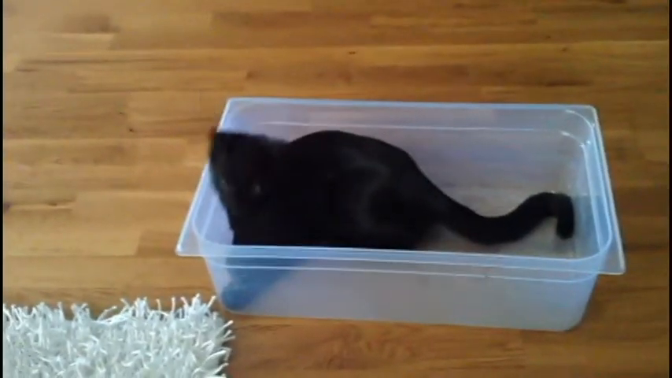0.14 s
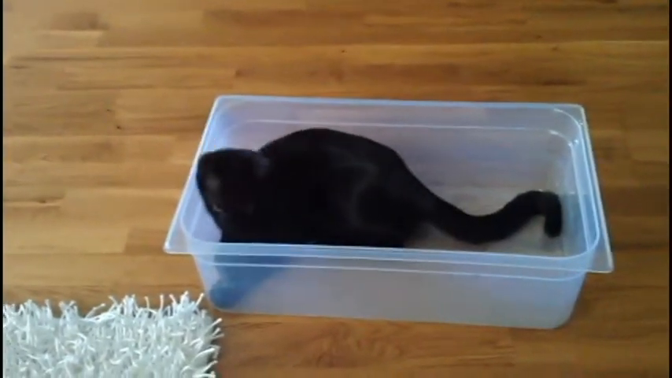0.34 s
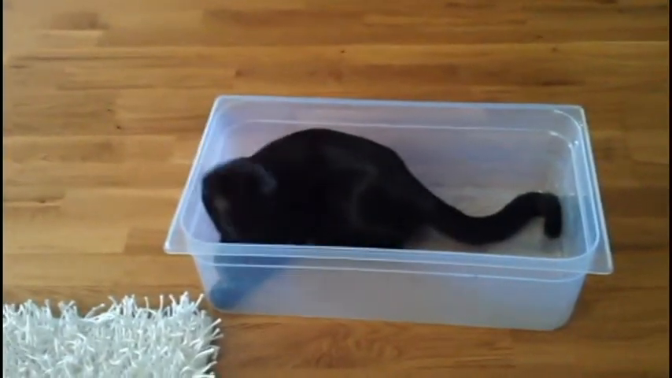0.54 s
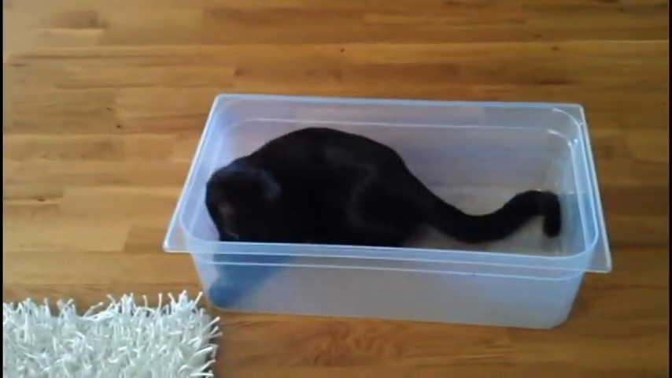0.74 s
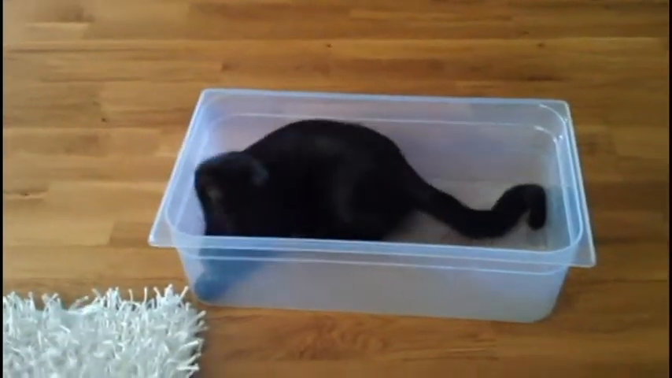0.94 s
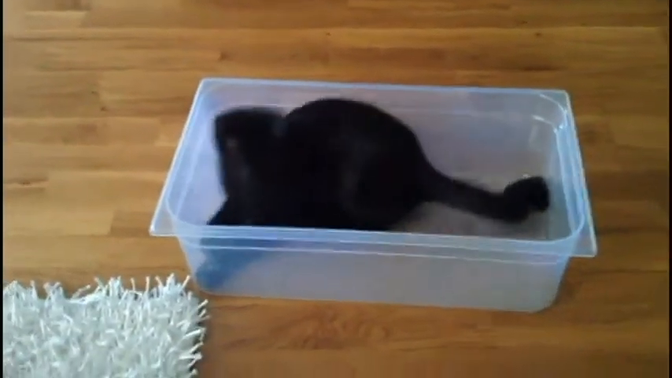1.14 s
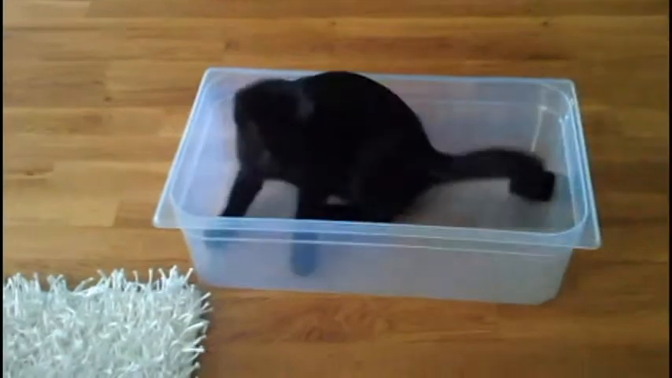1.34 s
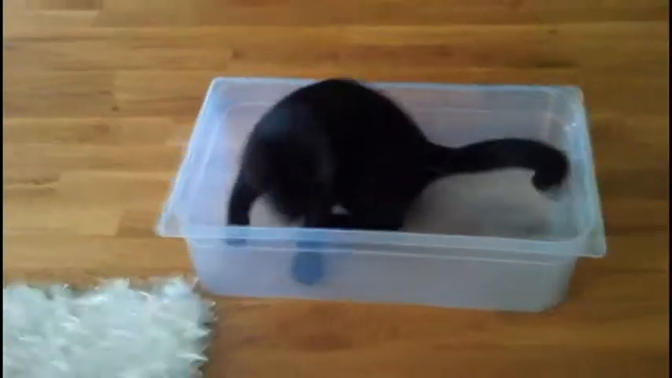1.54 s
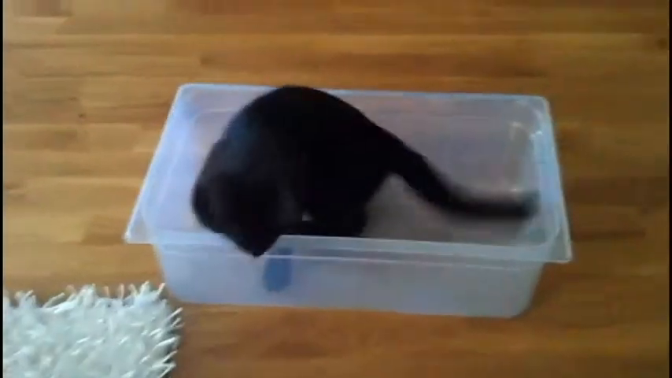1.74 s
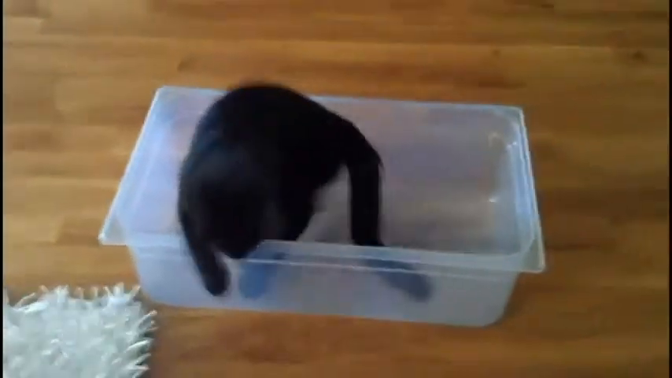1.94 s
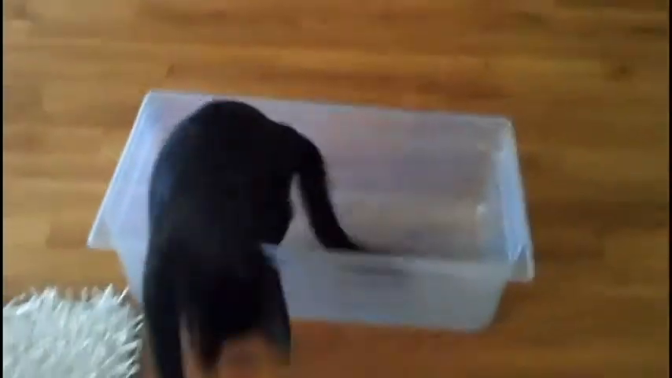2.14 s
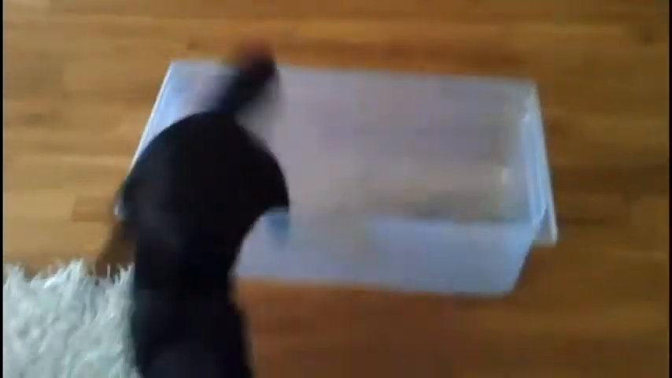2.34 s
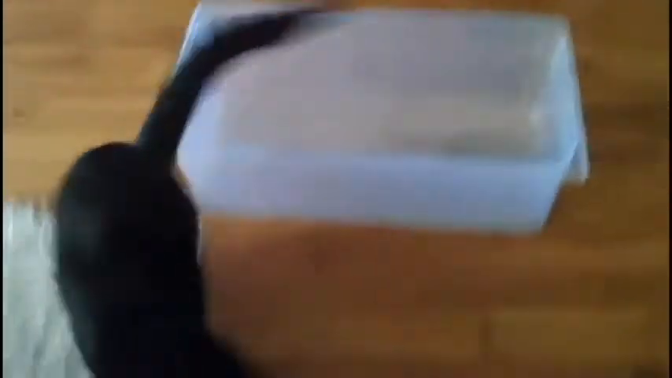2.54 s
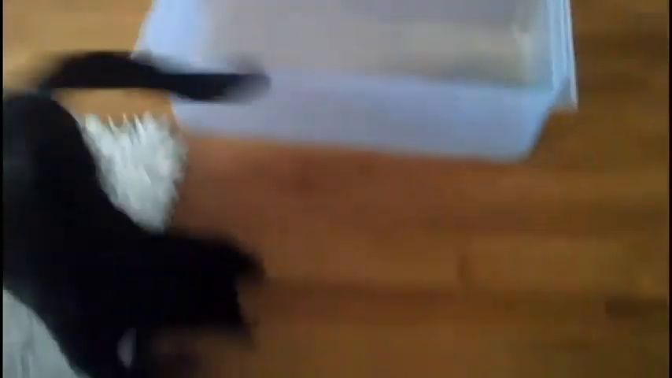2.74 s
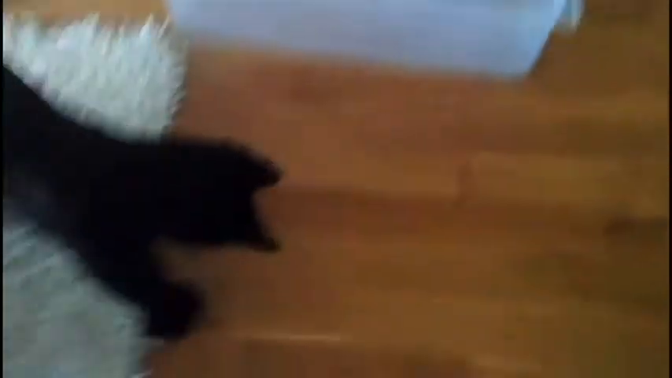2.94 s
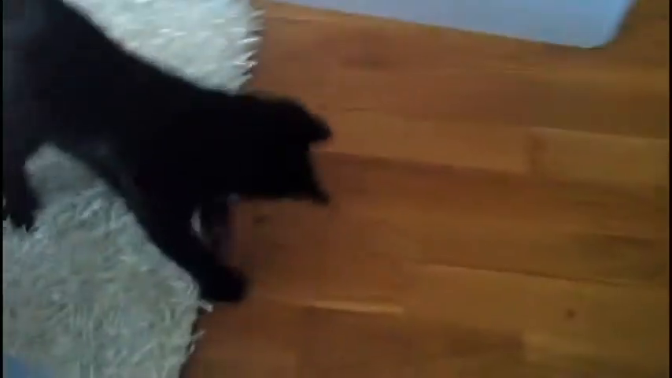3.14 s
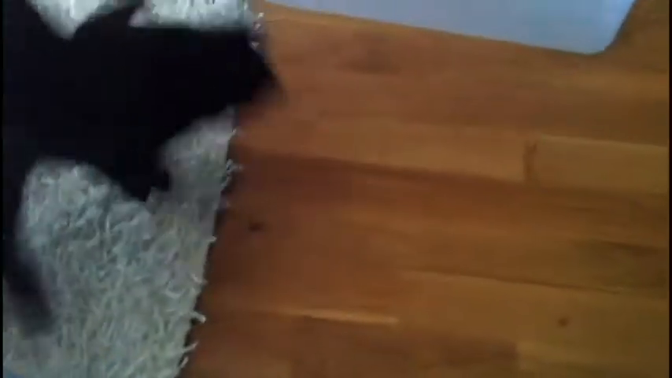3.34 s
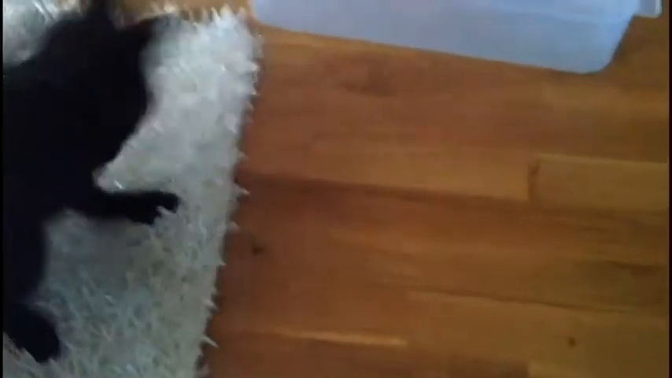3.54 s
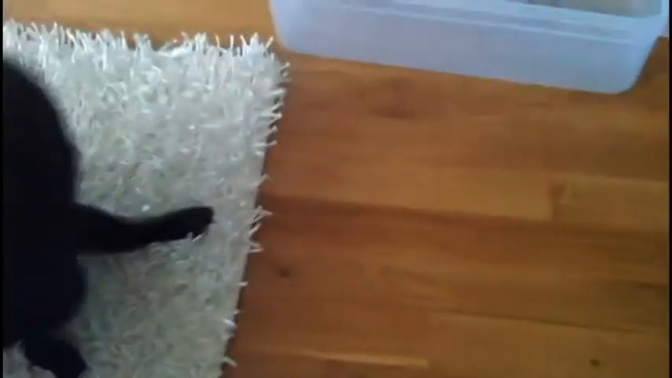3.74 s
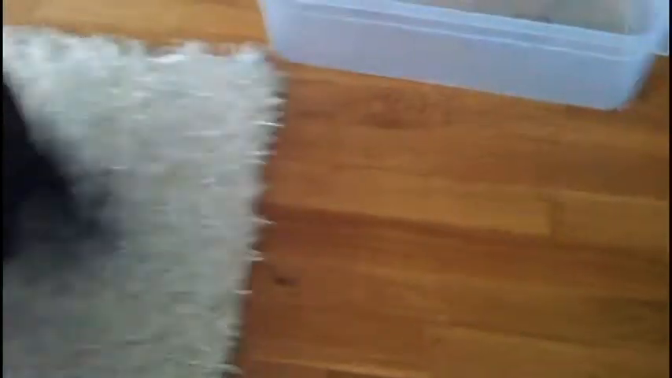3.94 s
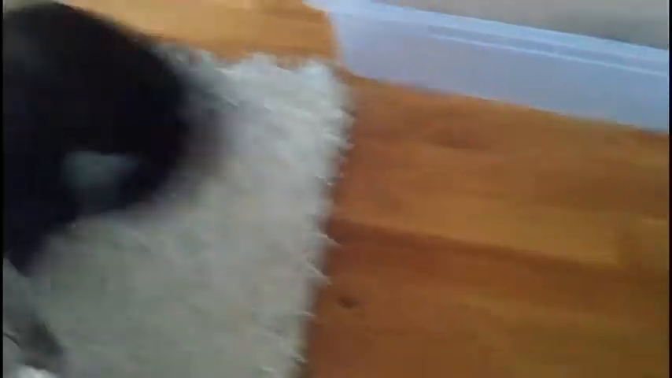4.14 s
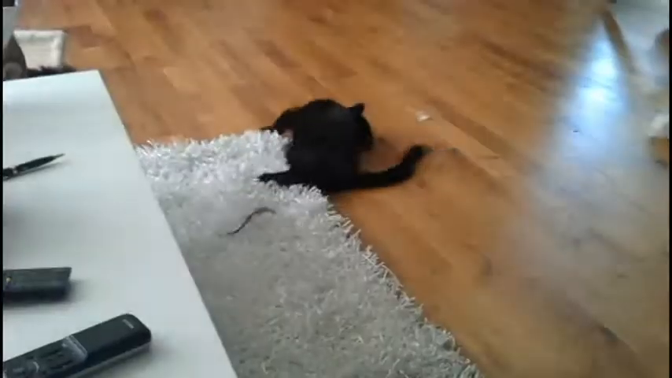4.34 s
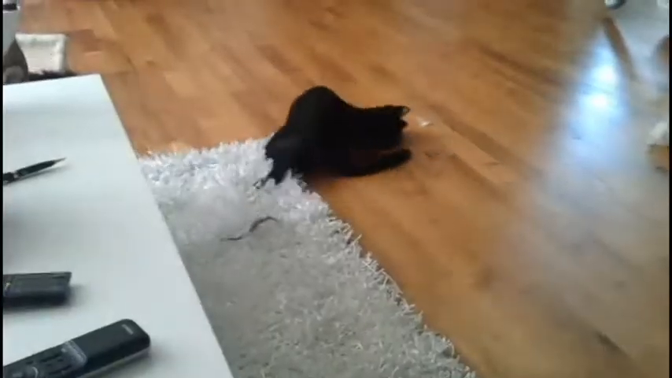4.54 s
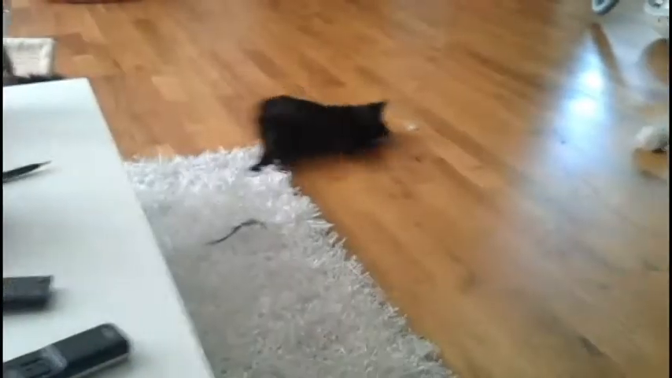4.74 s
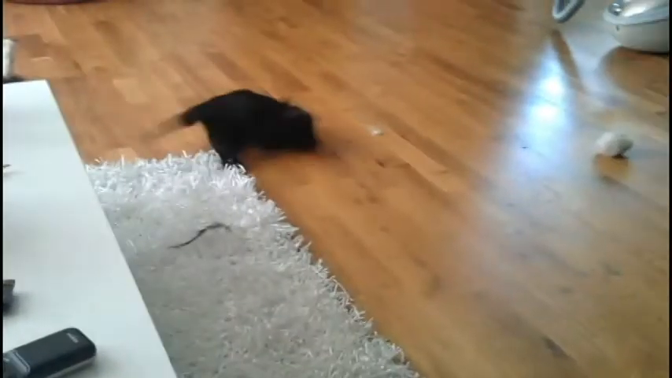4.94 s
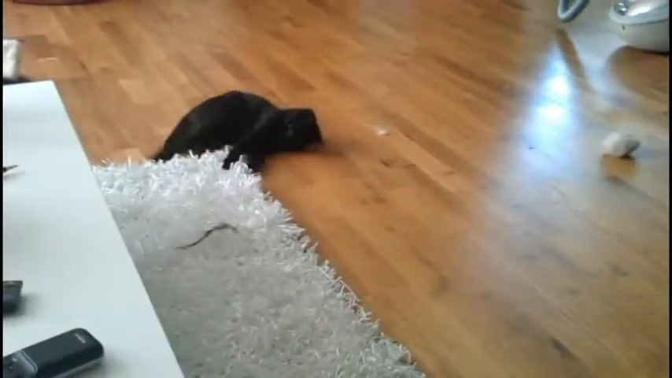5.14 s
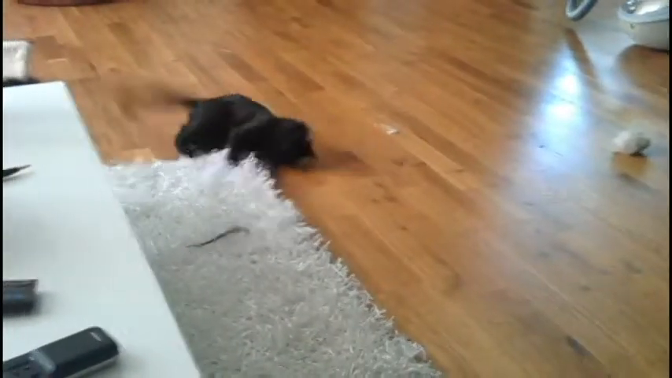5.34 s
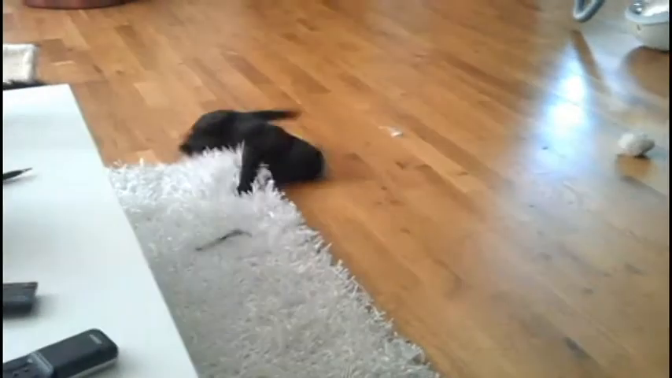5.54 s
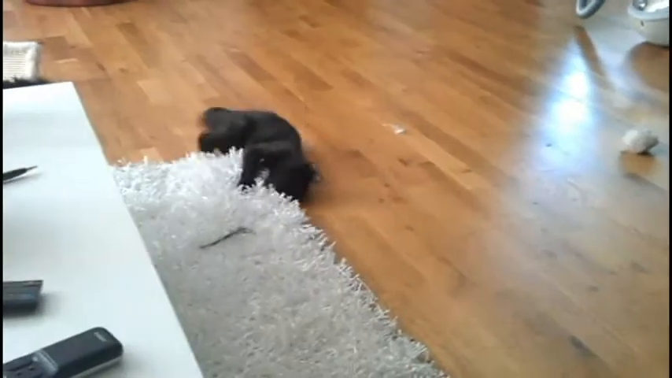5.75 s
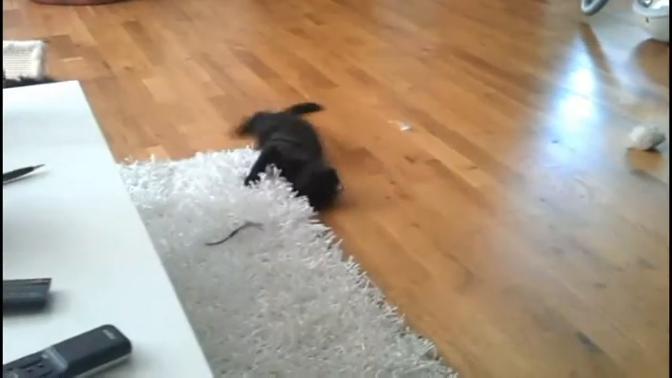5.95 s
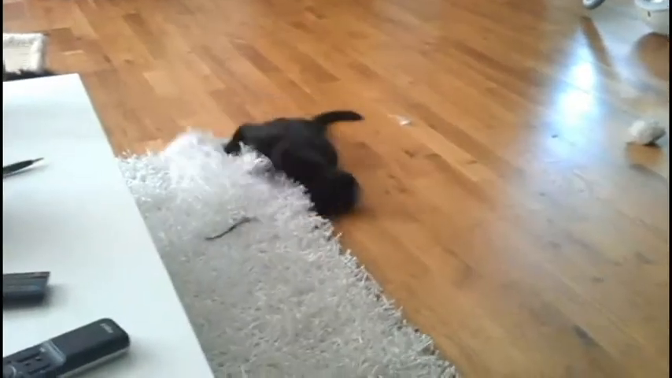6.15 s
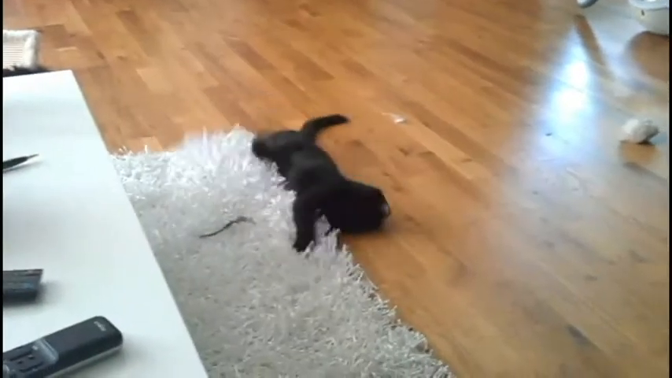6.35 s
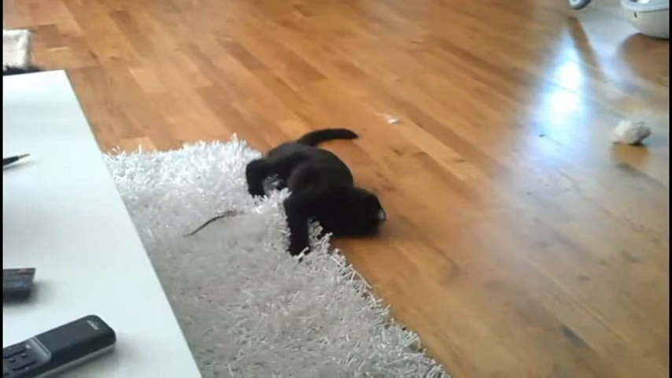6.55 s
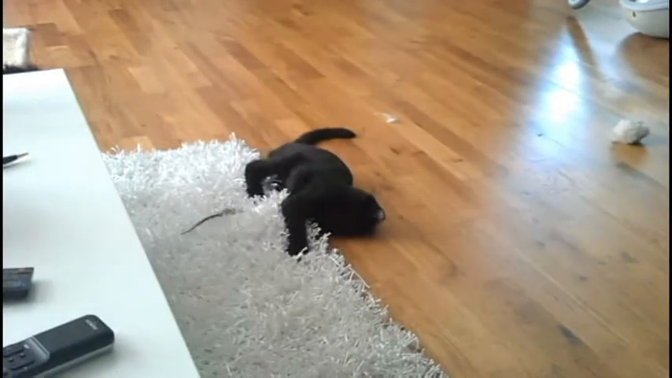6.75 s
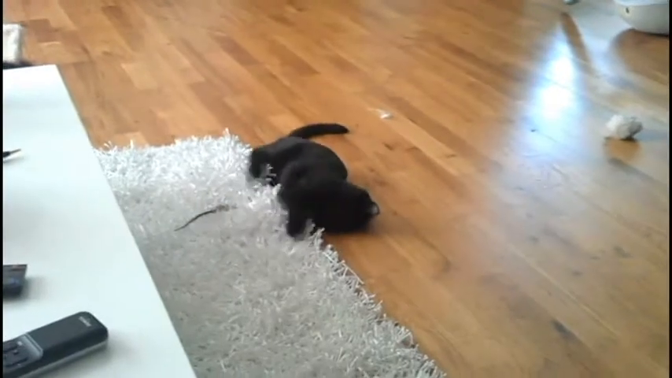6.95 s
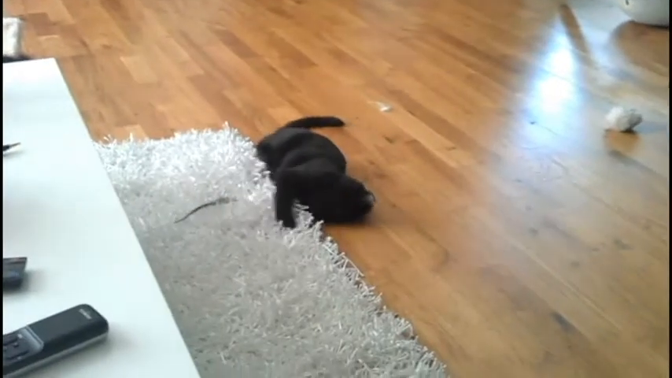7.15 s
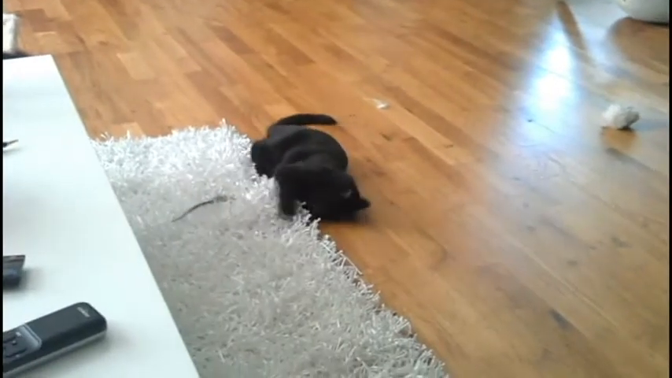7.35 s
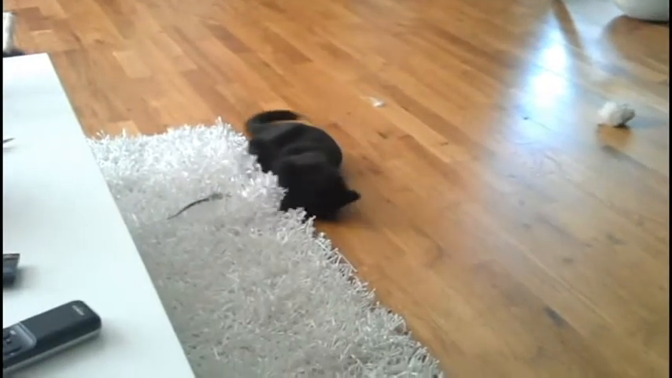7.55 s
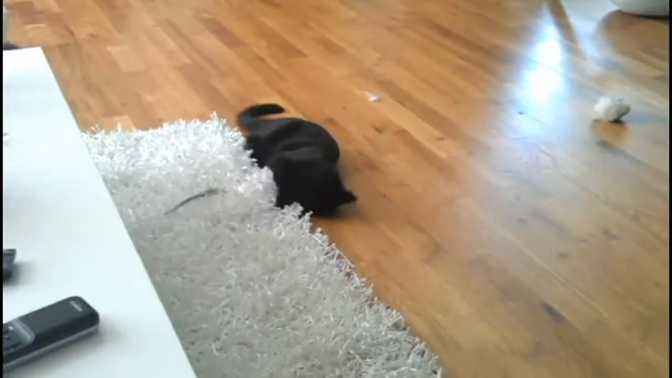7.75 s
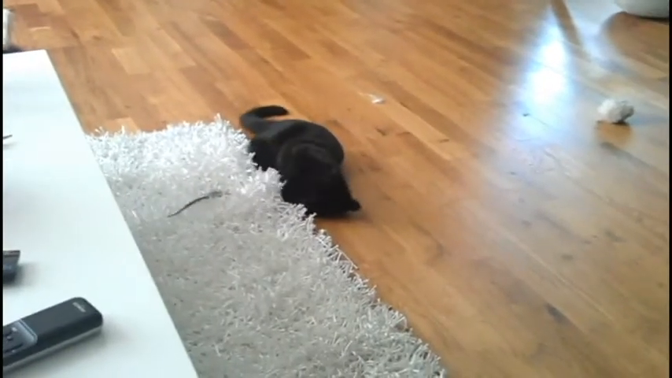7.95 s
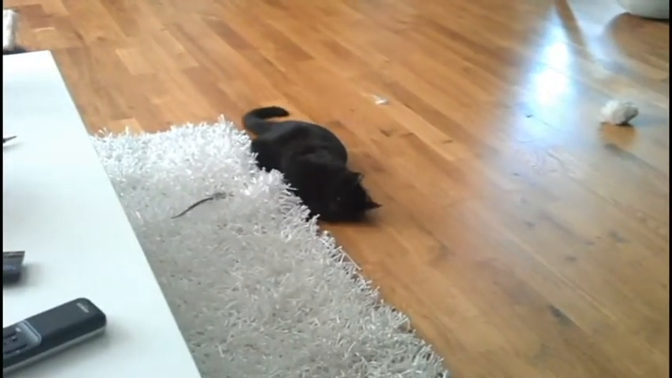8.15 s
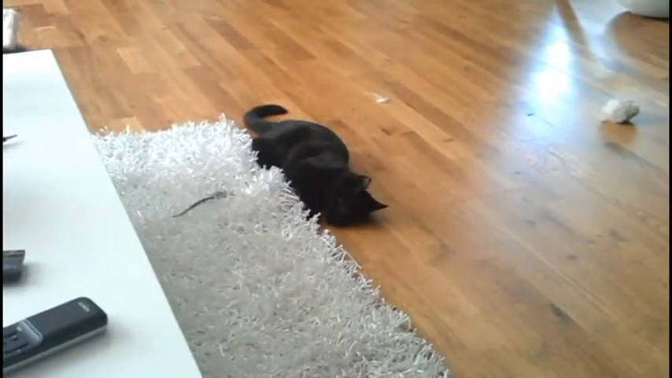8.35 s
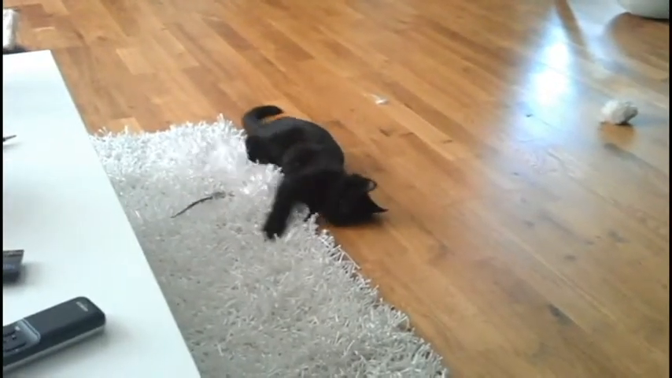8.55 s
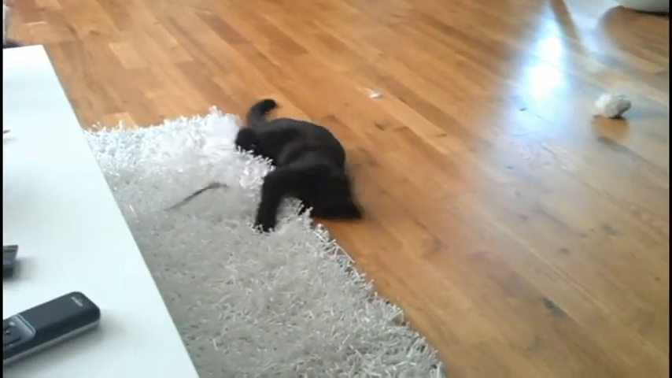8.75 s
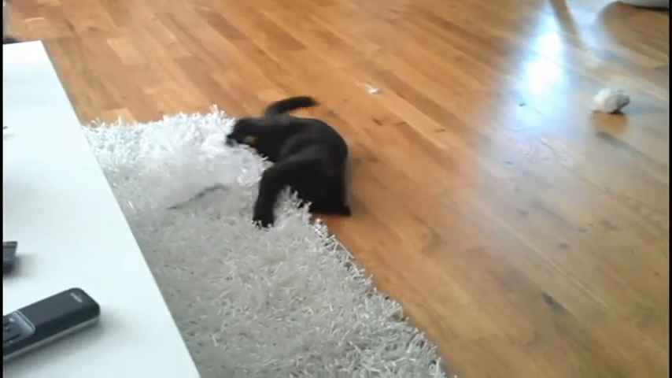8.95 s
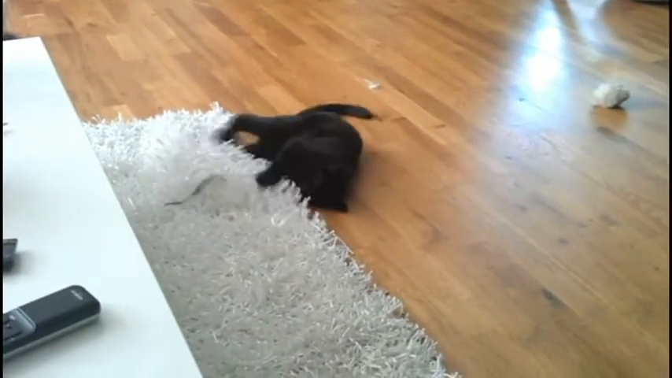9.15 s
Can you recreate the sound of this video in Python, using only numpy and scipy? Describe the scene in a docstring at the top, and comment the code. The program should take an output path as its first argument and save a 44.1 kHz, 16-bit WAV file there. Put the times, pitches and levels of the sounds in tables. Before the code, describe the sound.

Handheld stereo microphone in a live wood-floored room, thin hiss and faint high whine throughout. After a close handling bump and rubbing, a kitten passes near with thumps, sharp claw clicks and a bright double rattle at left. It then wrestles at a rug's edge with scratchy scuffs and light knocks, pausing before a little more scrabbling.

```python
"""Live, faintly hissing room with a wooden floor: a kitten tumbles at the edge of a rug.
Paws thump the boards as damped resonances; claws tick, crack and scrape as blips and noise bursts.
A small hard thing on the left lands twice in quick succession, each a run of ringing contacts.
Early on a hand knocks and rubs the camera, dry and close: shell modes and strokes of noise.
Each source on the floor gets a decaying-noise room tail; steady hiss and a thin whine lie under all."""
import sys
import numpy as np
from scipy import signal
from scipy.fft import rfft, irfft, next_fast_len
from scipy.io import wavfile

SR = 44100
rng = np.random.default_rng(int(sys.argv[2]) if len(sys.argv) > 2 else 0)


def bounce(signal):
    """Save signal as a 16-bit WAV file at the path given by the first command-line argument."""
    frames = np.transpose(np.atleast_2d(signal))
    limited = np.clip(frames, -1, 1)
    pcm = np.round(limited * 32767).astype(np.int16)
    wavfile.write(sys.argv[1], SR, pcm)


N = 409688
T_S = np.arange(SR // 2) / SR  # time axis of one event
TOP_HZ = 14100  # upper band limit
CONTACT_GAP_S, CONTACT_SCATTER = 0.003, 0.15  # spacing of chatter contacts; its relative scatter
CONTACT_LOSS_DB_PER_S = 380
SCRAPE_RELEASE_DB_PER_S, FUR_RELEASE_DB_PER_S = 87.5, 88

# Paws and body landing on the boards:
# (time [s], level [dB], board pitch [Hz], hardness: knock over thump [dB])
PAW_LANDINGS = [(1.961, -45, 350, 0.5), (2.259, -30.5, 324, -16), (2.459, -42, 328, -5),
                (2.528, -32, 315, 1.5), (2.811, -38, 320, -11), (2.844, -38.5, 339, 13),
                (2.869, -41, 410, -6), (3.785, -47.5, 255, -0.5), (3.902, -55.5, 287, -4),
                (4.061, -48, 338, -7.5), (4.458, -33.5, 312, -6.5), (4.477, -31.5, 281, -9.5),
                (4.613, -40.5, 401, -4.5), (4.986, -41.5, 340, 1), (5.338, -50.5, 310, -8),
                (5.393, -43.5, 323, -2.5), (5.526, -43.5, 338, -0.5), (5.6, -50.5, 317, 6),
                (5.835, -56.5, 282, 11.5), (6.188, -47, 306, 4), (6.371, -48, 340, -4),
                (6.474, -54.5, 265, 1.5), (8.628, -64, 318, 4), (8.792, -43.5, 310, -2),
                (8.945, -60.5, 325, 8.5), (9.062, -53, 339, 5)]
# Floor modes: (frequency [Hz], level before scatter [dB], t60 [s])
BOARD_MODES = [(177, -13, 0.16), (229.3, -20.5, 0.66), (322, -14, 0.21), (400, -10, 0.13)]
# Woody knock of a hard landing: (frequency [Hz], relative spectrum level [dB])
KNOCK_SPECTRUM = [(30, -27), (120, -21), (250, 6), (500, 7), (850, 0.5), (1300, -6.5), (3000, -11.5),
                  (9000, -45)]
# Claws catching the wood:
# (time [s], level [dB], pitch [Hz], crack [dB], drag: low = clean tick, high = scratch [dB])
CLAW_CATCHES = [(2.526, -35, 890, -12, -7), (2.756, -36.5, 1630, -7, -1.5), (2.809, -41, 1190, -18, -5),
                (2.954, -21.5, 3530, -19, -4), (3.782, -31.5, 1570, -30, -7), (3.892, -44.5, 1290, -12, -8),
                (4.06, -36, 1220, -33, -0.5), (4.383, -45, 1000, 2, -4), (4.611, -27, 1830, -9, 3.5),
                (4.621, -27.5, 1950, -17, -5), (5.373, -38.5, 1980, -13, -5),
                (5.405, -32.5, 1590, -6.5, -9), (5.523, -34, 2270, -23, -8.5),
                (5.6, -39.5, 1650, -12, -2.5), (5.883, -40, 1740, -20, -9), (6.181, -29, 1780, -15, -0.5),
                (6.221, -30.5, 1950, -20, -7), (6.427, -45.5, 1600, -22, -3.5), (6.473, -34, 2100, 1, -10),
                (6.571, -45.5, 1780, -20, -13), (6.966, -42, 1700, -4, -3.5),
                (8.127, -44.5, 2000, -15, 1.5), (8.526, -47.5, 885, -20, -3.5), (8.63, -45, 1210, -14, -2),
                (8.747, -38, 1980, -18, -13), (8.789, -32, 2150, -30, -2.5), (8.937, -37.5, 2080, -0.5, -8),
                (9.035, -41.5, 1500, -17, -8), (9.042, -37.5, 1790, -17, -3), (9.154, -41.5, 1800, -13, -7)]
# Sharp crack of a hard contact: (frequency [Hz], relative spectrum level [dB])
CRACK_SPECTRUM = [(100, -42), (700, -11), (2000, -3.5), (4100, 4), (5700, -3.5), (7800, -11), (9500, 0),
                  (11000, 5), (12000, 2.5), (13000, -13.5)]
# Grit under a dragging claw: (frequency [Hz], relative spectrum level [dB])
GRIT_SPECTRUM = [(150, -29), (400, -21), (850, -1), (1150, 5), (2000, 11), (3000, 3.5), (4500, -1),
                 (6000, -6.5), (7800, -26), (11000, -16), (13000, -19)]
# Landings of the small hard thing:
# (time [s], level [dB], chatter length [s], brightness at 10 kHz [dB])
HARD_LANDINGS = [(2.8441, -17, 0.019, -2.5), (2.8965, -27, 0.01, -7)]
# Modes of the small hard thing: (frequency before scatter [Hz], level before scatter [dB])
HARD_MODES = [(2217, -8), (2613, -3), (2937, -3), (3180, -2), (3463, -3), (3628, -3), (3893, -3),
              (4038, -3), (4258, -2), (4495, -2), (4725, -3), (5269, -6), (8247, -8), (10372, 1),
              (10543, 1), (11597, 1)]
# Swipes of a leg or the flank over wood and rug:
# (time [s], rise [s], scrape on wood [dB], brushing fur [dB])
SWIPES = [(2.252, 0.01, -46, -47), (2.29, 0.019, -47, -65), (2.52, 0.008, -43.5, -44.5),
          (2.6, 0.025, -49, -52), (2.75, 0.052, -45.5, -48), (4.22, 0.15, -52.5, -52),
          (4.378, 0.008, -45.5, -46), (4.44, 0.082, -47.5, -45.5), (4.608, 0.01, -36.5, -41),
          (4.68, 0.025, -49, -64), (4.982, 0.013, -41.5, -48.5), (5.25, 0.012, -55, -52),
          (5.33, 0.088, -42.5, -45), (5.52, 0.0076, -37.5, -59), (5.575, 0.025, -46, -50),
          (5.64, 0.038, -42.5, -51), (5.79, 0.093, -41, -50.5), (6.151, 0.027, -34.5, -46),
          (6.2, 0.041, -38, -52.5), (6.38, 0.071, -48, -55), (6.47, 0.012, -43.5, -45),
          (6.93, 0.042, -48.5, -57), (8.62, 0.022, -48, -51.5), (8.68, 0.098, -54, -62),
          (8.93, 0.016, -49, -51), (9.028, 0.017, -45, -52.5), (9.14, 0.035, -54, -67)]
# Scrape on wood: (frequency [Hz], relative spectrum level [dB])
SCRAPE_SPECTRUM = [(60, -27), (140, -17), (250, 5.5), (520, -7), (810, 6), (1150, -0.5), (1800, 1.5),
                   (2600, -5.5), (3200, -11.5), (4400, -11.5), (7500, -52), (11000, -32)]
# Brushing fur: (frequency [Hz], relative spectrum level [dB])
FUR_SPECTRUM = [(200, -19), (1500, -5), (4200, 3), (7800, -7), (10800, 5.5), (13000, -9)]
# Room share as the kitten passes close by, then plays further off: (time [s], room over direct [dB])
ROOM_SHARE = [(1.96, 2), (2.26, -5.5), (2.53, -2.5), (2.83, -10.5), (3.8, 5), (4.46, -1), (4.62, 8),
              (5.3, 8), (9.0, 6)]
# Room decay: (frequency [Hz], t60 [s])
ROOM_DECAY = [(100, 0.49), (250, 0.51), (1000, 0.47), (3000, 0.55), (6000, 0.6), (11000, 0.32)]
# Camera shell modes: (frequency [Hz], level [dB], time to peak [cycles], left over right [dB])
SHELL_MODES = [(327, -28, 1.3, 0), (822, -8, 1.3, -12.5), (1373, -17, 3.5, -13.5), (2070, -8, 1.64, -5),
               (3300, -15, 1.2, -2)]
# Finger strokes on the camera:
# (middle [s], half length [s], level [dB], brightness at 10 kHz [dB])
FINGER_STROKES = [(1.782, 0.045, -34.5, 1), (1.892, 0.041, -33, 3.5), (2.011, 0.038, -37.5, -2)]
# Rubbing skin: (frequency [Hz], relative spectrum level [dB])
SKIN_SPECTRUM = [(88, -57), (150, -19), (496, -18), (812, 1), (1120, -10), (1460, -1.5), (1610, -9.5),
                 (2020, -1.5), (2950, -11.5), (3370, -4.5), (4300, -14.5), (6550, -16), (7340, -23),
                 (10100, -13), (14000, -29)]
# Hiss: (frequency [Hz], relative spectrum level [dB])
HISS_SPECTRUM = [(24, -76), (40, -46), (65, -24), (86, -28.5), (166, -7.5), (264, -1.5), (372, -6),
                 (401, -1.5), (431, -8), (739, -4), (1180, -8), (2700, -9.5), (4150, -8.5), (5200, -13),
                 (7970, -19.5), (10700, -11.5), (14000, -16.5)]
# Hiss: (frequency [Hz], left-right correlation [-1..1])
HISS_LIKENESS = [(60, 0.53), (250, 0.62), (700, 0.04), (2000, 0.38), (10000, 0.1)]
# Hiss: (frequency [Hz], left over right [dB])
HISS_BALANCE = [(100, 1), (1000, 1), (4000, 3.5), (8000, 3), (11000, 8)]


def paws(cycles=1.47, joist_db=-8, boards_db=-12, knock_t60_s=0.027, room_db=0, left_db=2.5):
    """A soft pad swings the board and the slower joist for a few cycles; hardness adds a woody knock."""
    out = np.zeros((2, N))
    for time_s, level_db, pitch_hz, hard_db in PAW_LANDINGS:
        board = blip(pitch_hz, cycles)
        joist = amp(joist_db) * blip(pitch_hz * 0.717, cycles)
        floor = amp(boards_db) * ring(BOARD_MODES, scatter_db=2)
        thump = unit(board + joist + floor, span_s=0.02)
        knocking = amp(hard_db) * burst(KNOCK_SPECTRUM, knock_t60_s, alike=0.17)
        landing = in_room(thump + knocking, room_share_db(time_s) + room_db)
        add(out, time_s, amp(level_db) * landing)
    return out * pan(left_db)


def claws(cycles=1.18, tick_db=6, spread_db=-6, grit_db=-5, grit_t60_s=0.012, crack_t60_s=0.0068,
          room_db=2, left_db=5.5):
    """Each claw gives a tick of a few cycles, a sharp crack and, the more it drags, some grit."""
    out = np.zeros((2, N))
    for time_s, level_db, pitch_hz, crack_db, drag_db in CLAW_CATCHES:
        tick = amp(tick_db) * blip(pitch_hz, cycles)
        crack = amp(crack_db) * burst(CRACK_SPECTRUM, crack_t60_s, alike=0.26)
        grit = amp(grit_db + drag_db) * burst(GRIT_SPECTRUM, grit_t60_s, alike=0.26)
        # a dragging claw drives the board harder: more of its tick spreads into the room
        spread = min(amp(spread_db + drag_db), 1)
        direct = crack + (1 - spread) * tick
        roomy = in_room(grit + spread * tick, room_share_db(time_s) + room_db)
        add(out, time_s, amp(level_db) * (direct + roomy))
    return out * pan(left_db)


def clatter(ring_db=-15, ring_t60_cycles=600, crack_t60_s=0.014, wet_db=-8, left_db=9, echo_left_db=3):
    """A small hard thing chatters on the floor, each contact a bright crack with a short ring."""
    out = np.zeros((2, N))
    for time_s, level_db, bright_db in contacts():
        # the thing turns as it bounces: mode pitches shift slightly per contact
        modes = []
        for mode_hz, mode_db in HARD_MODES:
            shifted_hz = mode_hz * (1 + 0.002 * rng.normal())
            modes.append((shifted_hz, mode_db, ring_t60_cycles / shifted_hz))
        ringing = unit(ring(modes, scatter_db=2), span_s=0.005)
        hit = burst(CRACK_SPECTRUM, crack_t60_s, alike=0.082) + amp(ring_db) * ringing
        add(out, time_s, amp(level_db) * coloured(hit, [(4500, 0), (10000, bright_db)]))
    echo = in_room(out, wet_db) - out
    # direct sound well to the left, echo nearer the middle
    return out * pan(left_db) + echo * pan(echo_left_db)


def contacts():
    """Each landing is a quick, slightly uneven run of weakening contacts: (s, dB, brightness dB)."""
    for time_s, level_db, length_s, bright_db in HARD_LANDINGS:
        for k in range(int(length_s / CONTACT_GAP_S) + 1):
            jitter = min(k, 1) * CONTACT_SCATTER * rng.normal()  # none on the first contact
            late_s = CONTACT_GAP_S * (k + jitter)
            yield time_s + late_s, level_db - CONTACT_LOSS_DB_PER_S * late_s, bright_db


def scuffle(catch_db=2, wet_db=1, left_db=3):
    """Claws and pads slip over wood and rug in tiny random catches while the fur brushes along."""
    power = np.zeros((2, N))
    for time_s, rise_s, scrape_db, fur_db in SWIPES:
        scrape_level = amp(scrape_db) * swell(rise_s, SCRAPE_RELEASE_DB_PER_S)
        fur_level = amp(fur_db) * swell(rise_s, FUR_RELEASE_DB_PER_S)
        add(power, time_s, np.square([scrape_level, fur_level]))
    scrape, fur = np.sqrt(power)
    catch_happens = rng.random(N) < 350 / SR  # 350 per second on average
    catches = catch_happens * amp(4 * rng.exponential(size=N).clip(0, 3))
    friction = amp(catch_db) * unit(catches) + pair(N, alike=0.2)
    wood = unit(in_room(coloured(friction, SCRAPE_SPECTRUM), wet_db))
    brush = unit(coloured(pair(N, alike=0.15), FUR_SPECTRUM))
    return (scrape * wood + fur * brush) * pan(left_db)


def swell(rise_s, release_db_per_s):
    """A quarter-sine rise, then a steady fall in dB."""
    t_s = np.arange(SR) / SR
    up = np.sin(np.pi / 2 * np.minimum(t_s / max(rise_s, 1 / SR), 1))
    return up * amp(-release_db_per_s * np.maximum(t_s - rise_s, 0))


def handling():
    """The hand on the camera reaches the microphone without any room."""
    return knock() + rubs()


def knock(time_s=1.7433, level_db=0, click_db=-31, left_late_s=0.00038):
    """A dry knock on the camera: the highest shell mode peaks first, the lowest last; plus a click."""
    body = sum(amp(mode_db) * blip(mode_hz, cycles) * pan(left_db)
               for mode_hz, mode_db, cycles, left_db in SHELL_MODES)
    body[0] = np.interp(T_S - left_late_s, T_S, body[0], left=0)
    click = amp(click_db) * burst(CRACK_SPECTRUM, 0.02, alike=0.14)
    out = np.zeros((2, N))
    add(out, time_s, amp(level_db) * body + click)
    return out


def rubs(left_db=-1):
    """Fingers slide over the camera in three short strokes of coloured noise."""
    out = np.zeros((2, N))
    middle_s = T_S[-1] / 2
    for time_s, half_s, level_db, bright_db in FINGER_STROKES:
        skin = coloured(pair(len(T_S), alike=0.16), SKIN_SPECTRUM)
        rub = unit(coloured(skin, [(2500, 0), (10000, bright_db)]))
        stroke = np.exp(-np.abs((T_S - middle_s) / half_s) ** 3)
        add(out, time_s - middle_s, amp(level_db) * stroke * rub)
    return out * pan(left_db)


def hiss(level_db=-51.5, whine_hz=11000, whine_db=-68):
    """Steady room and microphone noise with a thin, fuzzy whine leaning left."""
    def mid_side(hz):
        # mid-side angle that gives the wanted left-right correlation
        angle = np.arccos(np.clip(along(HISS_LIKENESS, hz), -1, 1)) / 2
        return amp(along(HISS_SPECTRUM, hz)) * [np.cos(angle), np.sin(angle)] * (hz < TOP_HZ)

    mid, side = filtered(rng.standard_normal((2, N)), mid_side)
    air = filtered(np.array([mid + side, mid - side]),
                   lambda hz: amp(np.outer([.5, -.5], along(HISS_BALANCE, hz))))
    whine = unit(filtered(rng.standard_normal(N), lambda hz: 1 / (1 + ((hz - whine_hz) / 45) ** 2)))
    return amp(level_db) * unit(air) + amp(whine_db) * whine * pan(3.3)


def in_room(x, wet_db, gap_s=0.0027, shared_hz=400):
    """x plus a fresh noise tail, wet_db above it in energy, decaying per band; bass alike in both ears."""
    hz = np.fft.rfftfreq(256, 1 / SR)[:, None]
    t_s = np.arange(0, len(T_S) + 256, 128) / SR
    noise = rng.standard_normal((3, len(hz), 2 * len(t_s))).view(complex)
    share = 1 / (1 + (hz / shared_hz) ** 2)
    bands = np.sqrt(share) * noise[2] + np.sqrt(1 - share) * noise[:2]
    bands = bands * np.exp(-np.log(1000) * t_s / along(ROOM_DECAY, hz))
    tail = signal.istft(bands, SR, nperseg=256)[1][:, :len(T_S)]
    tail = tail * (1 - np.exp(-(T_S / gap_s) ** 2))  # soft start after the direct sound
    echo = signal.fftconvolve(x, tail, axes=1)[:, :x.shape[-1]]
    return x + amp(wet_db) * unit(echo) * np.sqrt(np.mean(x ** 2))


def room_share_db(time_s):
    """Room over direct sound for the kitten's place at a given time."""
    return np.interp(time_s, *np.transpose(ROOM_SHARE))


def microphone(x, low_cut_hz=145):
    """A small microphone passes little bass and no top treble."""
    low_cut = signal.butter(4, low_cut_hz, "high", fs=SR, output="sos")
    high_cut = signal.butter(10, 13200, fs=SR, output="sos")
    return signal.sosfilt(np.vstack([low_cut, high_cut]), x)


def blip(hz, cycles):
    """A heavily damped resonance: its envelope peaks after the given cycles, then dies away."""
    u = np.minimum(T_S * hz / max(cycles, .3), 30)
    return (u * np.exp(1 - u)) ** 2 * np.sin(2 * np.pi * hz * T_S)


def ring(modes, scatter_db):
    """Damped modes, struck at new strengths each time."""
    return sum(amp(level_db + scatter_db * rng.normal()) * fade(t60_s) * np.sin(2 * np.pi * hz * T_S)
               for hz, level_db, t60_s in modes)


def burst(spectrum, t60_s, alike):
    """Coloured noise dying away, of rms 1 over its first half t60."""
    return unit(coloured(pair(len(T_S), alike) * fade(t60_s), spectrum), span_s=t60_s / 2)


def fade(t60_s):
    """Exponential decay by 60 dB in t60_s."""
    return np.exp(-np.minimum(np.log(1000) * T_S / max(t60_s, 1e-4), 40))


def pair(n, alike):
    """White noise in two channels, partly shared."""
    share = np.clip(alike, 0, 1)
    return np.sqrt(share) * rng.standard_normal(n) + np.sqrt(1 - share) * rng.standard_normal((2, n))


def coloured(x, spectrum, size=2048):
    """Causal minimum-phase colouring: nothing sounds ahead of a blow."""
    cepstrum = irfft(np.log(amp(along(spectrum, np.fft.rfftfreq(size, 1 / SR)))))
    cepstrum[1:size // 2] *= 2
    cepstrum[size // 2 + 1:] = 0
    impulse = irfft(np.exp(rfft(cepstrum)))
    return signal.fftconvolve(x, impulse[None], axes=1)[:, :x.shape[-1]]


def filtered(x, response):
    """x through a zero-phase response, given as a function of frequency."""
    n = x.shape[-1]
    size = next_fast_len(n + 8192)
    return irfft(rfft(x, size) * response(np.fft.rfftfreq(size, 1 / SR)), size)[..., :n]


def along(points, hz):
    """Interpolate (Hz, value) points on a log frequency axis."""
    points_hz, values = np.transpose(points)
    return np.interp(np.log(hz + 1), np.log(points_hz), values)


def amp(db):
    """Decibels to gain."""
    return 10 ** (np.asarray(db) / 20)


def unit(x, span_s=None):
    """Scale to rms 1, over the first span_s if given."""
    head = x if span_s is None else x[..., :max(8, int(span_s * SR))]
    return x / np.sqrt(np.mean(head ** 2) + 1e-20)


def pan(left_db):
    """Gains of the two channels, left over right by left_db."""
    return amp([[left_db / 2], [-left_db / 2]])


def add(track, time_s, x):
    """Mix x into the track from time_s."""
    part = track[:, round(time_s * SR):][:, :x.shape[-1]]
    part += x[..., :part.shape[-1]]


def scene():
    """Kitten, clatter and camera handling through the microphone, over the hiss."""
    sources = paws() + claws() + clatter() + scuffle() + handling()
    return microphone(sources) + hiss()


def record(dry):
    """The sound drops out for 9 ms, the highest peaks are rounded off, the treble ends at TOP_HZ."""
    playing = np.abs(np.arange(N) / SR - 4.202) > .0045
    rounded = dry / (1 + (dry / .7) ** 6) ** (1 / 6)
    return filtered(rounded * playing, lambda hz: hz < TOP_HZ)


dry = scene()
out = record(dry)
bounce(out)
```